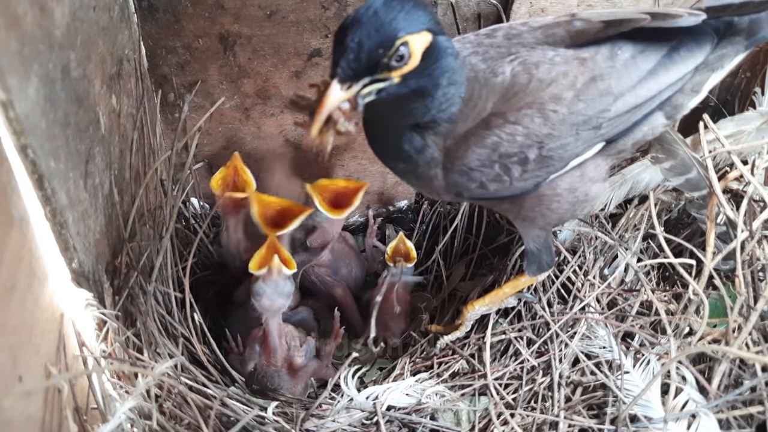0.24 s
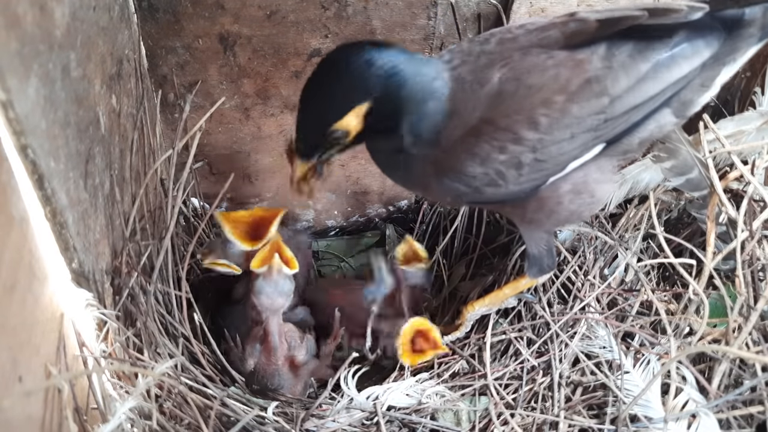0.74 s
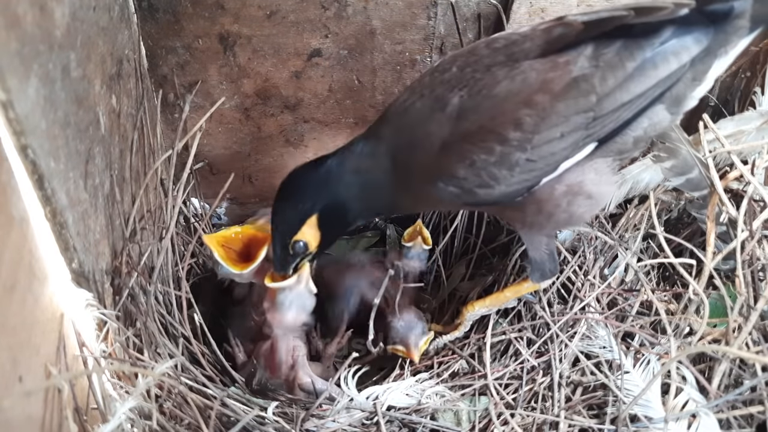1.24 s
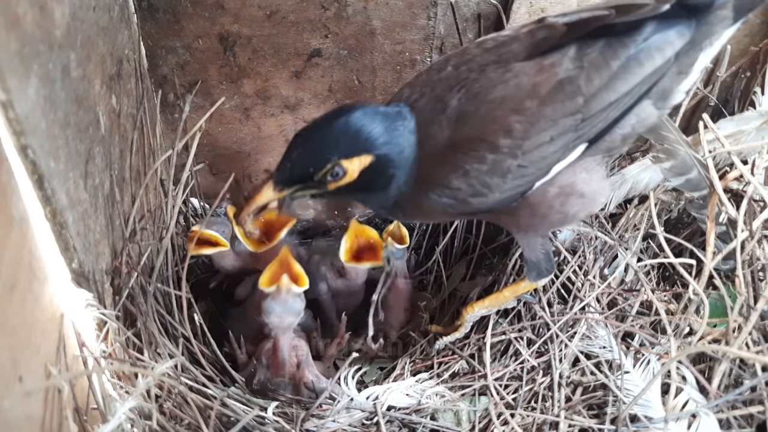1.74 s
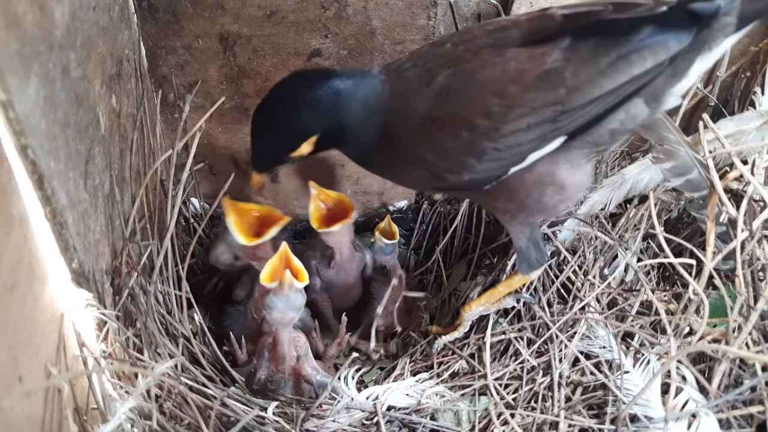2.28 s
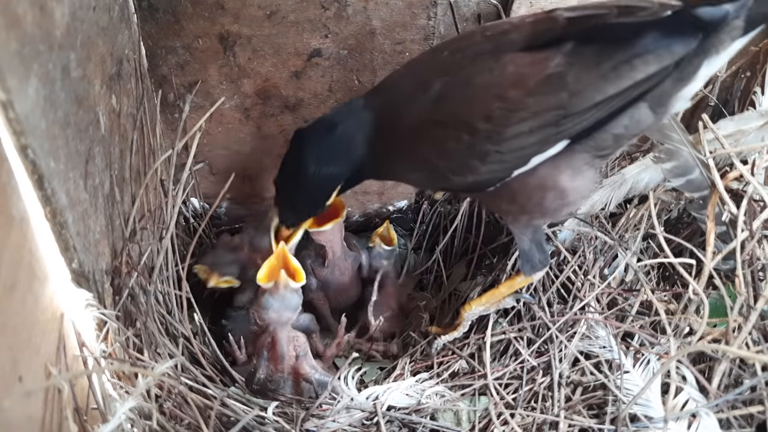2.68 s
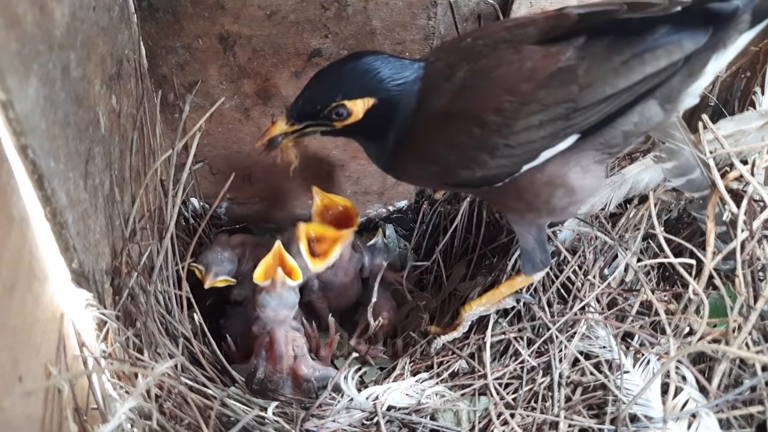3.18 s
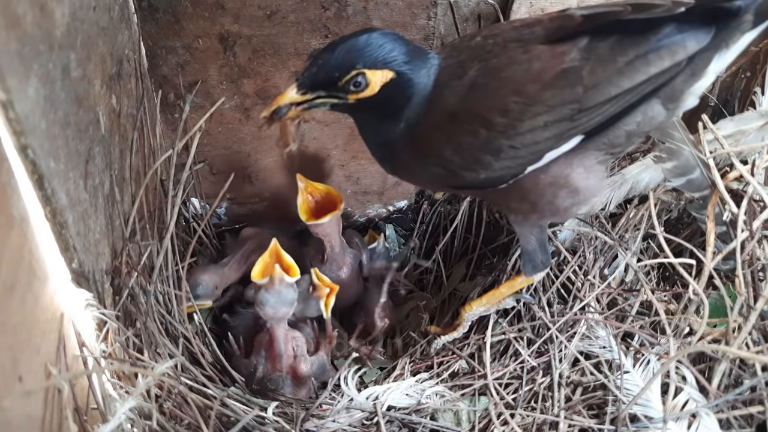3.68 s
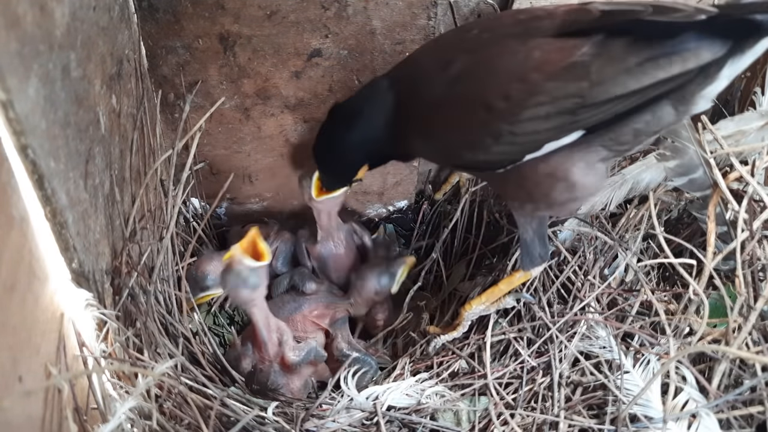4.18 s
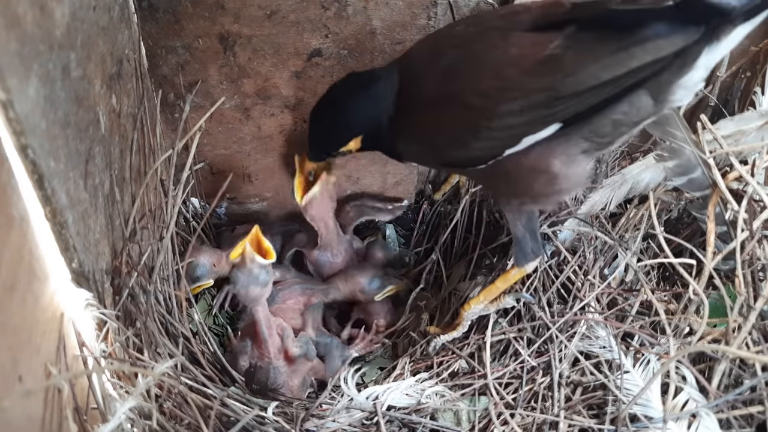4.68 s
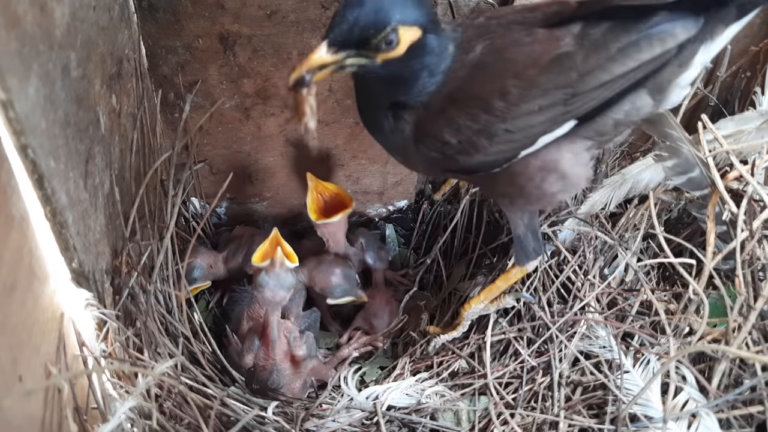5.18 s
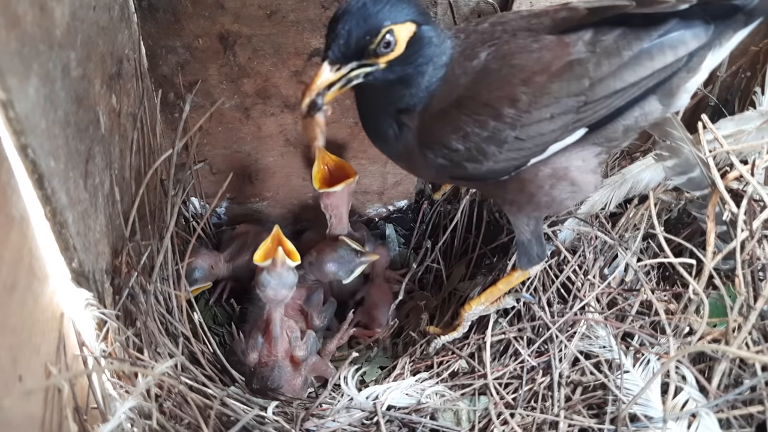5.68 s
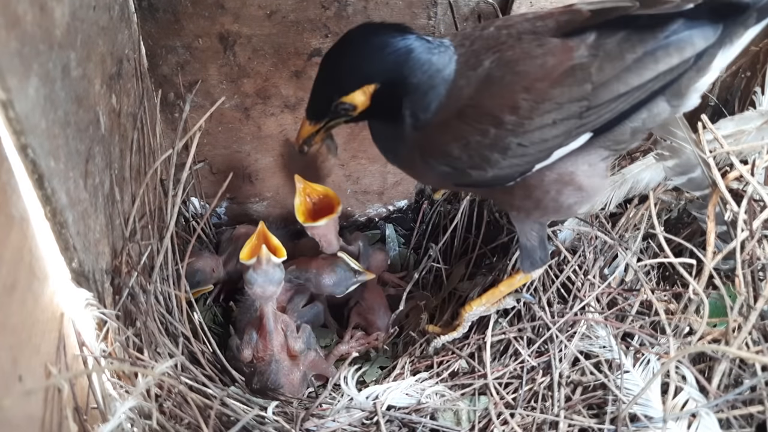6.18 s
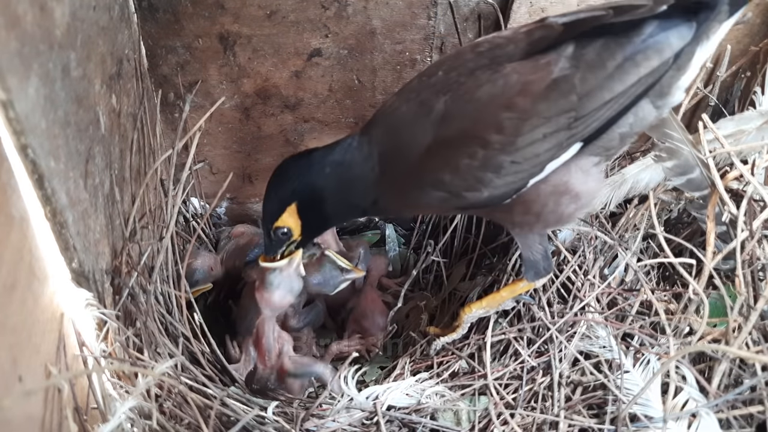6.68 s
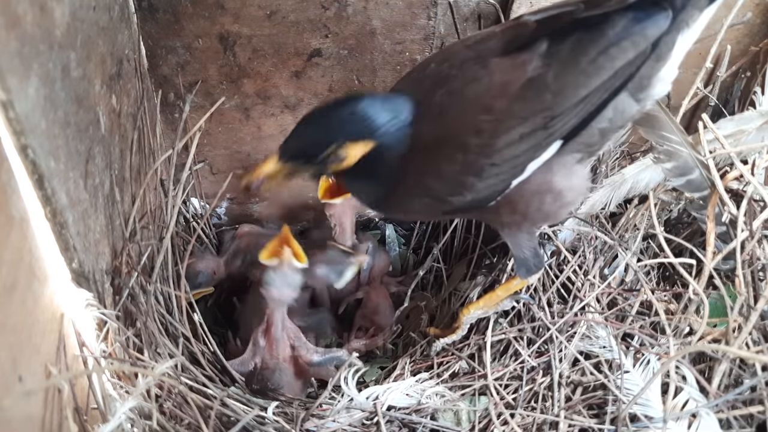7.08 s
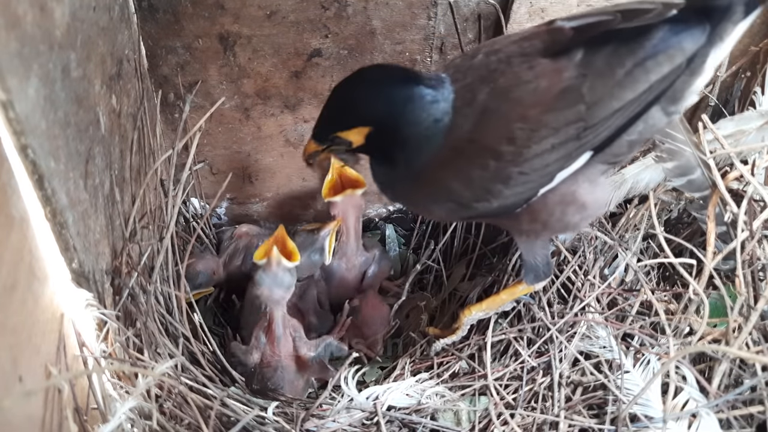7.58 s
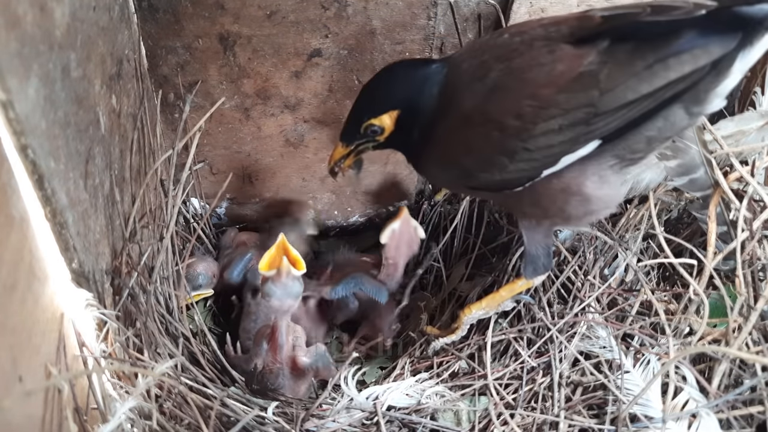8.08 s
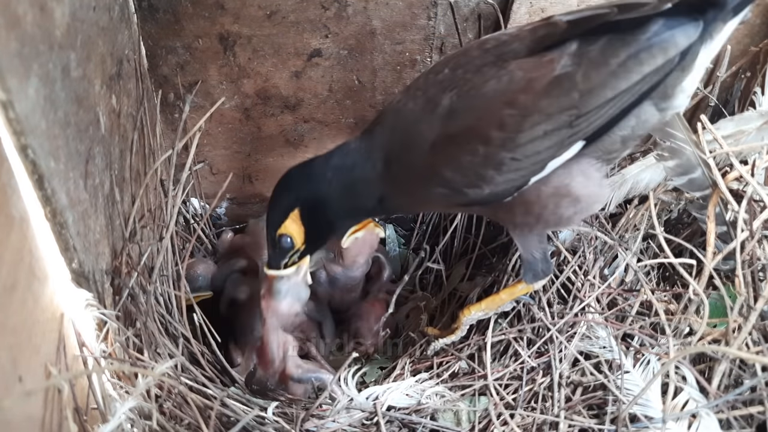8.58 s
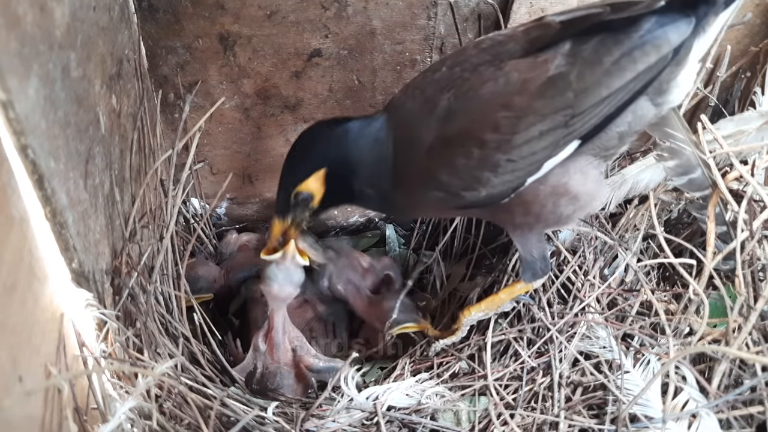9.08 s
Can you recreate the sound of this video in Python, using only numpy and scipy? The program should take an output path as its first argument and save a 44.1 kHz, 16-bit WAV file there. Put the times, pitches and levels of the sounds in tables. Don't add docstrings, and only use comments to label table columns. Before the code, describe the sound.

Piercing baby-bird begging whistles crowd together, then thin out, over dry twig rustles, small wooden knocks, insect hiss and faint distant caws.

```python
import sys
import numpy as np
from scipy import signal
from scipy.fft import rfft, irfft, next_fast_len
from scipy.io import wavfile
from scipy.ndimage import uniform_filter1d

SR = 44100
rng = np.random.default_rng(int(sys.argv[2]) if len(sys.argv) > 2 else 0)


def materialize(psi):
    bounded = np.clip(np.atleast_2d(psi).T, -1, 1)
    quanta = np.round(bounded * 32767).astype(np.int16)
    wavfile.write(sys.argv[1], SR, quanta)


def ratio(d):
    e = np.asarray(d, float) / 20
    return 10 ** e


N = 411894
SPAN = next_fast_len(N)


def evened(x):
    return x / np.sqrt(np.mean(abs(x) ** 2) + 1e-20)


def read(points, hz):
    f, value = np.transpose(points)
    return np.interp(np.log(hz + 1), np.log(f + 1), value)


def add(mix, start_s, sound):
    part = mix[round(start_s * SR):][:len(sound)]
    part += sound[:len(part)]


def wobble(size):
    return evened(uniform_filter1d(uniform_filter1d(rng.standard_normal(N), size), size))


def filtered(x, order, hz, kind):
    return signal.sosfilt(signal.butter(order, hz, kind, fs=SR, output="sos"), x)


def ports(x, side, left=1, colour=((1, 0), (2, 0))):
    hz = np.fft.rfftfreq(SPAN, 1 / SR)
    lean = ratio(read(side, hz))
    balance = np.array([lean * left, np.ones(len(lean))]) / np.sqrt((1 + lean ** 2) / 2)
    share = ratio(read(colour, hz)) * balance
    return irfft(rfft(x, SPAN) * share, SPAN)[:, :N]


def noise(shape, same, patchy_db, size):
    hz = np.fft.rfftfreq(size, 1 / SR)
    a, b, c, d, patches = rng.standard_normal((N * 4 // size + 5, len(hz), 5)).T
    patches = uniform_filter1d(patches, size=5, axis=0)
    patches = evened(uniform_filter1d(patches, size=9, axis=1))
    same = np.clip(same / (1 + (hz[:, None] / 600) ** 2), 0, 1)
    first, other = a + 1j * b, c + 1j * d
    z = np.array([first, same * first + np.sqrt(1 - same ** 2) * other])
    z = z * ratio(read(shape, hz)[:, None] + patchy_db * patches)
    return evened(signal.istft(z, nperseg=size, noverlap=size * 3 // 4)[1][:, :N])


# frequency in Hz, level in dB per Hz.
INSECT_SPECTRUM = [(1500, -76.5), (3700, -106), (4200, -66.5), (4600, -56.5), (6300, -48), (9080, -63.5),
                   (10200, -78), (15500, -94)]


def insects():
    swell_db = 0.7 * wobble(size=9000)
    return noise(INSECT_SPECTRUM, same=0.3, patchy_db=0.3, size=256) * ratio(-41 + swell_db)


# frequency in Hz, level in dB per Hz.
RUSTLE_SPECTRUM = [(18, -45), (40, -3), (162, 0.5), (431, -9), (737, -9.5), (1050, -18.5), (2300, -34),
                   (5500, -23)]
# centre in seconds, length in seconds, rise in dB.
SHIFTS = [(0.681, 0.087, 17.5), (1.074, 0.39, 8), (1.682, 0.06, 7.5), (2.786, 0.34, 8), (3.91, 0.27, 10.5),
          (4.363, 0.13, 9.5), (4.92, 0.15, 7.5), (5.581, 0.033, 10.5), (6.484, 0.091, 9.5),
          (7.013, 0.23, 7.5), (7.95, 0.24, 12.5), (8.652, 0.21, 10), (9.047, 0.099, 13)]


def twigs():
    t = np.arange(N)[::64] / SR
    effort_db = sum(db * np.exp(-((t - s) / length_s) ** 2) for s, length_s, db in SHIFTS)
    effort_db = effort_db.repeat(64)[:N]
    low_db = effort_db - 53 + 1.25 * wobble(size=500)
    low = noise(RUSTLE_SPECTRUM, same=0.75, patchy_db=4.24, size=1024) * ratio(low_db)

    cracks = (rng.random(N) < 0.08) * ratio(3 * rng.exponential(1, N))
    tail = rng.standard_normal((2, 400)) * np.exp(-np.arange(400) / 60)
    stems = signal.oaconvolve(cracks[None], tail, axes=1)[:, :N]
    crackle = filtered(stems, 3, [800, 1850], "band")
    fine = filtered(stems, 4, 8500, "high")
    flicker_db = 5.5 * wobble(size=350)
    fine = evened(fine) * ratio(-70 + 0.64 * effort_db + flicker_db)
    return low + fine + evened(crackle) * ratio(-72 + 1.38 * effort_db + flicker_db)


# start in seconds, length in seconds, from Hz, to Hz, level in dB. Straight glides
FADES = [(.173, 0.0058, 4450, 4130, -27.5), (.516, 0.052, 2490, 2215, -41.5),
         (.599, 0.046, 4420, 4240, -30.5), (1.047, 0.011, 4360, 4370, -21),
         (1.058, 0.023, 3900, 4300, -23.5), (1.072, 0.029, 3610, 3010, -33.5),
         (1.154, 0.026, 4370, 3890, -17.5), (1.19, 0.053, 3000, 2070, -41),
         (1.427, 0.037, 4450, 4430, -34.5), (1.683, 0.028, 4390, 4670, -22),
         (1.7, 0.063, 3086, 2430, -34), (1.838, 0.024, 2440, 2200, -50),
         (2.36, 0.049, 2830, 2600, -38.5), (2.518, 0.02, 4060, 3540, -26.5),
         (2.525, 0.038, 2480, 2050, -53.5), (3.2, 0.054, 4470, 4150, -26.5),
         (3.258, 0.026, 4020, 3450, -47), (3.29, 0.077, 3360, 3700, -59),
         (3.762, 0.033, 2690, 2460, -46.5), (4.452, 0.03, 4280, 4030, -33.5),
         (4.5, 0.049, 4420, 3520, -44), (4.83, 0.053, 3970, 3400, -40),
         (5.513, 0.06, 4020, 3175, -29.5), (5.651, 0.079, 3540, 2580, -37.5),
         (5.948, 0.038, 4540, 4390, -35), (6.439, 0.037, 4010, 3540, -27),
         (6.466, .012, 4740, 3900, -31), (6.661, 0.054, 4380, 4150, -35),
         (7.375, 0.051, 4220, 4260, -38), (7.906, 0.044, 4370, 5150, -33.5),
         (8.637, 0.028, 3390, 3330, -27), (8.67, 0.052, 3140, 2590, -34),
         (8.892, 0.029, 4640, 4100, -38.5),
         (.057, 0.012, 6370, 5480, -21), (0.209, 0.044, 4920, 4830, -22),
              (0.211, 0.022, 4640, 4660, -25), (0.323, 0.042, 5620, 5100, -30.5),
              (0.416, 0.075, 4960, 4150, -30.5), (0.484, 0.017, 6600, 4800, -23.5),
              (0.579, 0.026, 5350, 4640, -22.5), (0.894, 0.019, 5840, 4520, -22),
              (1.299, 0.0064, 6200, 5400, -18), (1.302, 0.027, 4780, 4480, -28.5),
              (1.416, .016, 5050, 4190, -24), (1.696, 0.02, 6660, 5200, -26),
              (1.759, 0.018, 5750, 5000, -28), (1.867, 0.01, 5500, 4700, -33),
              (1.972, 0.011, 5220, 4030, -27), (2.055, 0.033, 5700, 5020, -19),
              (2.29, 0.013, 5580, 4450, -23.5), (2.522, 0.033, 5800, 5100, -20),
              (2.536, 0.028, 6060, 4930, -19), (2.613, 0.029, 6550, 5370, -29),
              (3.031, 0.024, 5500, 5130, -18.5), (3.594, 0.027, 5740, 4720, -16.5),
              (3.686, 0.011, 6080, 5300, -26), (3.698, 0.018, 5310, 5500, -17.5),
              (3.754, 0.03, 4630, 4490, -18), (3.93, 0.028, 4750, 3520, -37.5),
              (4.155, 0.0144, 5970, 5130, -23), (4.268, 0.021, 4970, 4200, -26.5),
              (4.754, 0.013, 5720, 5200, -16), (4.937, 0.053, 5370, 4750, -32.5),
              (5.347, 0.04, 5930, 5040, -18.5), (5.986, 0.023, 5500, 4760, -22.5),
              (5.997, 0.025, 5590, 5270, -21), (7.193, 0.017, 4470, 3910, -27),
              (7.348, 0.035, 4560, 4340, -35.5), (7.613, 0.028, 5670, 5000, -20.5),
              (7.698, 0.016, 5340, 5100, -15.5), (7.771, 0.017, 6130, 5470, -29),
              (7.976, 0.037, 4650, 5050, -33.5), (8.822, 0.07, 5550, 5720, -36.5)]
HOLDS = [(.079, 0.0095, 4710, 4570, -35), (.504, 0.016, 4820, 4550, -28),
         (.912, 0.015, 4420, 4300, -29), (.955, 0.027, 3550, 3820, -42),
         (1.002, 0.042, 4720, 4130, -19), (1.108, 0.028, 2810, 2940, -42),
         (1.136, 0.012, 4320, 4380, -20.5), (1.143, 0.047, 3020, 3030, -35),
         (1.558, 0.026, 4360, 4560, -28), (1.616, 0.047, 4550, 4430, -26.5),
         (1.78, 0.039, 4310, 4400, -29.5), (1.879, 0.012, 4400, 4470, -29.5),
         (1.982, 0.0083, 4050, 4050, -33.5), (2.325, 0.024, 4320, 4360, -24),
         (2.449, 0.016, 3955, 4090, -11), (3.08, 0.031, 4410, 4460, -14),
         (3.114, 0.038, 4310, 4400, -25), (3.785, 0.02, 4380, 3870, -28),
         (4.256, 0.01, 4130, 4440, -30), (4.291, 0.04, 4185, 4470, -23),
         (4.324, 0.024, 4350, 4170, -30), (4.346, 0.028, 4210, 4620, -28),
         (4.365, 0.033, 4300, 4130, -38), (4.397, 0.027, 4270, 4280, -22),
         (4.42, 0.023, 4020, 4310, -33), (4.42, 0.067, 4350, 4670, -28.5),
         (4.674, 0.0132, 2990, 3330, -33.5), (4.688, .056, 3310, 2520, -29),
         (4.741, 0.02, 3700, 3640, -33.5), (6.472, 0.014, 3670, 3350, -29),
         (6.479, 0.019, 3830, 3800, -25), (7.908, 0.019, 3900, 3940, -42.5),
         (8.088, 0.024, 4400, 4550, -38), (8.108, 0.038, 4620, 4510, -40),
         (8.147, 0.024, 4550, 4630, -37.5), (8.49, 0.018, 3210, 3350, -34.5),
         (8.514, 0.021, 3680, 3870, -29.5), (8.538, 0.0059, 3590, 3970, -31.5),
         (8.817, 0.078, 4380, 4390, -31),
         (0.067, 0.0088, 5260, 4640, -30), (0.214, 0.018, 5770, 6200, -46),
              (0.322, 0.061, 4600, 5170, -28), (0.54, 0.011, 4740, 4670, -35),
              (0.928, 0.015, 4860, 5100, -34.5), (0.964, 0.022, 4900, 5000, -35),
              (1.05, 0.026, 4800, 4850, -30), (1.666, 0.014, 4790, 4080, -23.5),
              (1.717, 0.015, 5400, 5510, -31.5), (1.734, 0.054, 4910, 4260, -23),
              (1.938, 0.032, 4160, 5360, -30), (2.278, 0.014, 5540, 5520, -27),
              (2.506, 0.0075, 5860, 6160, -24), (2.889, 0.026, 5230, 5300, -28),
              (2.936, 0.018, 5580, 5570, -19.5), (2.944, 0.04, 4850, 4770, -23.5),
              (2.984, 0.0097, 4960, 4360, -28), (2.996, 0.029, 4920, 5090, -21),
              (3.037, 0.074, 4830, 4780, -26), (3.013, 0.013, 5060, 5280, -22.5),
              (3.157, 0.038, 5370, 5530, -36), (3.173, 0.037, 4810, 3880, -19),
              (3.904, .022, 4630, 4720, -33), (4.255, 0.026, 5500, 5790, -33.5),
              (4.259, 0.035, 5080, 5370, -29), (4.281, 0.02, 5130, 4970, -45),
              (4.328, 0.031, 5260, 5500, -35), (4.39, 0.048, 4900, 5290, -34.5),
              (4.864, 0.017, 5200, 5030, -28.5), (4.917, 0.026, 5640, 5860, -31),
              (5.692, 0.012, 5440, 5600, -32.5), (6.444, 0.024, 5420, 5560, -33),
              (7.91, 0.041, 5320, 5430, -40), (7.946, 0.025, 4950, 4850, -34.5),
              (8.04, 0.02, 5200, 5540, -38), (8.061, 0.023, 4630, 4600, -32),
              (8.685, 0.078, 5380, 5300, -35.5), (8.751, 0.034, 5420, 6320, -40.5),
              (8.786, 0.016, 5060, 4880, -36), (8.805, .012, 4900, 4530, -32)]
SWELLS = [(.567, 0.031, 4170, 5500, -40), (.985, 0.02, 5080, 5370, -21), (1.084, 0.062, 4680, 4270, -22),
          (1.286, 0.012, 5920, 5920, -17), (1.39, .02, 4980, 5230, -30), (1.673, 0.02, 7280, 6820, -18.5),
          (1.847, 0.02, 4200, 5480, -29), (2.335, 0.055, 3630, 4000, -29), (2.375, 0.059, 3920, 4340, -20),
          (3.14, 0.014, 3970, 4850, -24), (3.586, 0.039, 4200, 3970, -24.5), (3.63, 0.028, 3870, 4100, -27),
          (4.755, 0.059, 2390, 2730, -33.5), (4.975, 0.088, 4800, 4720, -30.5),
          (5.567, .077, 3250, 3430, -39), (6.497, 0.067, 4760, 4310, -30),
          (6.607, 0.056, 4600, 4430, -31.5), (7.166, 0.031, 5480, 5530, -32),
          (7.593, 0.019, 5720, 5410, -12), (7.607, 0.08, 2760, 3260, -41.5)]
ARCH_FADES = [(0.375, 0.067, 2630, 2410, -32.5), (0.647, 0.038, 4250, 4150, -28.5),
              (1.552, 0.049, 5370, 4800, -34), (2.057, 0.057, 6050, 4920, -26),
              (2.433, 0.017, 4440, 4400, -23), (2.293, 0.04, 4100, 3600, -28),
              (2.369, 0.034, 4200, 5140, -24.5), (2.464, 0.057, 3970, 4070, -16.5),
              (3.187, 0.069, 2510, 2170, -32.5), (3.602, 0.038, 5740, 5170, -21.5),
              (3.74, 0.061, 5660, 5120, -30), (4.163, 0.029, 5520, 5270, -17.5),
              (4.765, 0.031, 5710, 4820, -18.5), (5.16, 0.07, 4540, 4260, -38.5),
              (6.092, 0.027, 4780, 4700, -21), (6.577, 0.063, 3000, 2580, -46),
              (6.649, 0.084, 2660, 2580, -43), (7.21, 0.17, 3976, 4800, -33),
              (7.523, 0.076, 3780, 2700, -32.5), (7.876, 0.056, 5220, 4780, -34),
              (8.652, 0.046, 4540, 5100, -34.5)]
ARCH_SWELLS = [
    (.29, 0.033, 4600, 4760, -29.5),
    (3.067, 0.037, 2470, 3170, -30.5),
    (3.662, 0.055, 4250, 4040, -28),
    (3.724, 0.025, 4460, 4840, -19),
    (3.917, 0.051, 2830, 2250, -35.5),
    (4.368, 0.025, 4430, 4350, -25),
    (7.956, 0.064, 5300, 5500, -40),
]
SAGS = [(.212, 0.033, 4430, 4280, -36.5), (.372, 0.069, 4450, 4560, -40.5),
        (.948, 0.033, 4400, 4600, -23.5), (1.576, 0.037, 4270, 4620, -22), (1.686, 0.041, 4010, 4240, -29),
        (1.728, 0.091, 4230, 3860, -32), (2.917, 0.034, 4400, 4430, -20), (3.018, 0.057, 4360, 4390, -20.5),
        (3.115, 0.072, 2930, 2550, -31), (3.712, 0.041, 4050, 4430, -28.5), (3.801, 0.047, 4570, 4040, -28),
        (3.873, 0.032, 4600, 4600, -32.5), (5.056, 0.1, 4450, 4600, -33), (5.731, 0.11, 4760, 4680, -32),
        (5.817, 0.028, 4460, 5380, -36), (5.853, 0.08, 5360, 4370, -33), (6.569, 0.033, 4000, 4040, -33.5),
        (7.687, .09, 3200, 2550, -43), (7.275, 0.056, 5300, 5620, -34.5), (8.008, 0.04, 4570, 4800, -36.5),
        (8.698, 0.077, 4880, 5020, -32)]
# start in seconds, top pitch in Hz, level in dB.
CHIRPS = [
    (.14, 5240, -38.5),
    (1.034, 3530, -36),
    (1.362, 4880, -28.5),
    (5.483, 4130, -33.5),
    (8.603, 3470, -35),
]
# start in seconds, top pitch in Hz, level in dB.
PEEPS = [
    (5.711, 5730, -33),
    (6.496, 3050, -38.5),
    (6.939, 5360, -34),
    (8.545, 3960, -35.5),
]


def syllables():
    u = np.linspace(0, 1, 12)
    hump = 0.07 * np.sin(np.pi * u)
    fade_db, swell_db, even_db = -9 * u ** 3.6, -5.5 * (1 - u) ** 3.6, 0 * u
    chirp_s, chirp_rise = 0.045, 0.14
    peep_s, peep_drop = 0.036, 0.16
    chirps = [(s, chirp_s, hz * (1 - chirp_rise), hz, db) for s, hz, db in CHIRPS]
    peeps = [(s, peep_s, hz, hz * (1 - peep_drop), db) for s, hz, db in PEEPS]
    kinds = [(FADES, 0, fade_db),
             (HOLDS, 0, even_db),
             (SWELLS, 0, swell_db),
             (ARCH_FADES, hump, fade_db),
             (ARCH_SWELLS, hump, swell_db),
             (SAGS, -hump, even_db),
             (chirps, hump / 2, swell_db / 2),
             (peeps, -0.75 * hump, fade_db)]
    calls = []
    for rows, bend, shape_db in kinds:
        for s, length_s, from_hz, to_hz, db in rows:
            glide_hz = from_hz + (to_hz - from_hz) * u
            calls.append((s + length_s * u, glide_hz * (1 + bend), db + shape_db))
    return calls


# pitch in Hz, level in dB.
SECOND = [(2600, -7.5), (3300, -6.5), (4000, -19.5), (4500, -17.5), (5000, -14.5), (5800, -9.5)]
# pitch in Hz, level in dB.
THIRD = [(2600, 5), (4400, -11), (5500, -8)]
# time in seconds, lift in dB.
GAPE = [
    (0, 10),
    (3.2, 2),
    (9, 0.5),
]


def whistles():
    flutter, drift, sway, gulp = wobble(size=220), wobble(size=50), wobble(size=450), wobble(size=300)
    gulp_db, rasp_db = 2.8, 2.5
    voices = np.zeros((2, N))
    for s, hz, db in syllables():
        at = np.arange(round(s[0] * SR) - 90, round(s[-1] * SR) + 130)
        t = at / SR
        own = (at + rng.integers(N)) % N
        pitch = uniform_filter1d(np.interp(t, s, hz), size=len(at) // 8, mode="nearest")
        pitch = pitch * (1 + 0.0025 * drift[own] + 0.00864 * sway[own])
        turn = 2 * np.pi * (np.cumsum(pitch) / SR + rng.random())
        seat, split = rng.standard_normal(2)
        turn = turn + [[0], [0.5 * seat]]

        second_db = read(SECOND, pitch) + np.interp(t, *np.transpose(GAPE))
        second_db += gulp_db * gulp[own] + rasp_db * (drift[own] - 1)
        second_db += 0.038 * (max(db) + 22)
        third_db = second_db + read(THIRD, pitch) + gulp_db * (gulp[own[::-1]] - gulp[own])
        fourth_db = third_db - 5 - (pitch - 2600) / 80
        tone = np.sin(turn) + ratio(second_db) * np.sin(2 * turn) + ratio(third_db) * np.sin(3 * turn)
        tone += ratio(fourth_db) * np.sin(4 * turn) * (pitch < 3900)

        edge = np.clip(np.minimum(at - at[0], (at[-1] - at) * 1.33) / 130, 0, 1) ** 2
        lean_db = np.array([[1.3], [-1.3]]) * split
        level_db = np.interp(t, s, db) + 2 * flutter[own] + rasp_db / 2 * drift[own[::-1]] + lean_db
        voices[:, at] += np.sqrt(2) * ratio(level_db) * edge * tone
    return voices


def bill_air(voices):
    push = abs(uniform_filter1d(abs(voices[0]), size=900)) ** 0.7
    return ratio(-30) * push * filtered(rng.standard_normal((2, N)), 2, 7000, "high")


def box_echo(voices):
    t = np.arange(1500) / SR
    box = rng.standard_normal((2, 1500)) * ratio(-60 * t / 0.066) * (t > 0.0007)
    box /= np.linalg.norm(box[0])
    return ratio(-14) * signal.oaconvolve(voices, box, axes=1)[:, :N]


# frequency in Hz, left over right in dB.
CHICK_SIDE = [(2600, 12), (3200, 6), (4050, 13), (4900, -1), (5700, 6), (7200, -3), (9200, 5), (12000, 13)]
# frequency in Hz, lead of left in radians.
CHICK_LEAD = [(2600, -2.6), (4200, -1.8), (5000, -2.6), (5600, -1.6), (6600, -2.6), (11000, -5.4)]
# frequency in Hz, gain in dB.
BOX_COLOUR = [(3700, -3), (4300, -1), (4900, 0), (5600, 0), (6500, 7.5), (7600, -2.5), (9200, 2.5),
              (13000, -4)]


def chicks():
    voices = whistles()
    voices = filtered(voices + 1e-12, 2, 12000, "low") + bill_air(voices)
    left = np.exp(1j * read(CHICK_LEAD, np.fft.rfftfreq(SPAN, 1 / SR)))
    return ports(voices + box_echo(voices), CHICK_SIDE, left, BOX_COLOUR)


# start in seconds, pitch in Hz, level in dB.
FAR = [
    (0.188, 1535, -55.5),
    (1.04, 1386, -52.5),
    (1.53, 1490, -49),
    (2.204, 1386, -53.5),
    (3.185, 1380, -57.5),
    (4.985, 587, -43),
    (5.28, 2090, -65),
    (9.152, 1480, -55),
]


def far_birds():
    out = np.zeros(N)
    for s, hz, db in FAR:
        width_hz, length_s = 0.06 * hz, 0.24
        u = np.arange(0, 1, 1 / (SR * length_s))
        rough = rng.standard_normal((SR, 2)) @ [1, 1j]
        blur = signal.lfilter([1], [1, -np.exp(-np.pi * width_hz / SR)], rough)[:len(u)]
        glide_hz = hz * (1.03 - 0.18 * u)
        note = evened(blur) * np.exp(2j * np.pi * np.cumsum(glide_hz) / SR)
        add(out, s, ratio(db) * np.sqrt(2) * note.real * np.sin(np.pi * u) ** 0.79)
    return out


# start in seconds, peak in dB, ring in Hz.
KNOCKS = [(0.632, -30, 704), (0.71, -30, 737), (1.437, -40, 1010), (7.379, -34.5, 545), (8.021, -37.5, 797),
          (8.41, -34, 975), (.54, -41.5, 866), (2.752, -37, 1310), (3.782, -39.5, 715), (4.348, -39.5, 574),
          (6.962, -43.5, 486)]


def knocks():
    out, t = np.zeros(N), np.arange(3000) / SR
    for s, db, hz in KNOCKS:
        thud = evened(filtered(rng.standard_normal(3000), 2, [hz / 2, hz * 2], "band"))
        ring = np.sin(2 * np.pi * hz * t) + 0.87 * ratio(-60 * t / 0.039) * thud
        add(out, s, ratio(db - 60 * t / 0.085) * np.minimum(t / 0.0018, 1) * ring)
    return out


# start in seconds, peak in dB.
TICKS = [(0.8739, -46), (1.2306, -34), (1.372, -29), (2.864, -30), (2.8754, -33), (4.15, -35),
         (4.1584, -34), (4.2453, -35), (4.3844, -33), (4.4548, -42), (4.795, -38), (4.9187, -37)]


def ticks():
    out, t = np.zeros(N), np.arange(3000) / SR
    for s, db in TICKS:
        add(out, s, ratio(db - 7 - 60 * t / 0.016) * np.diff(rng.standard_normal(3003), 3))
    return out


# start in seconds, peak in dB.
SNAPS = [
    (7.9818, -44),
    (8.0216, -33.5),
]


def snaps():
    out, t = np.zeros(N), np.arange(3000) / SR
    for s, db in SNAPS:
        add(out, s, ratio(db + 12 - 60 * t / 0.032) * np.diff(rng.standard_normal(3001)))
    return out


# frequency in Hz, left over right in dB.
AIR_SIDE = [(200, 11), (1000, 5), (2500, 2), (7500, -4), (10000, 6)]


def scene():
    single = far_birds() + knocks() + ticks() + snaps()
    around = insects() + twigs() + [single, np.roll(single, 9)]
    return chicks() + ports(around, AIR_SIDE)


def band_limit(x):
    return signal.sosfilt(signal.butter(12, 15980, fs=SR, output="sos"), x)


def record(dry):
    treble_cut = signal.firwin(511, 15900, window=("kaiser", 9), fs=SR)
    dry = filtered(dry, 3, 52, "high")
    mix = signal.oaconvolve(dry, treble_cut[None], "same", axes=1)
    return band_limit(mix)


dry = scene()
out = record(dry)
materialize(out)
```